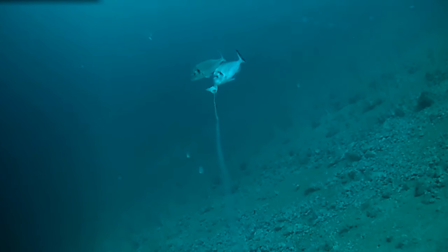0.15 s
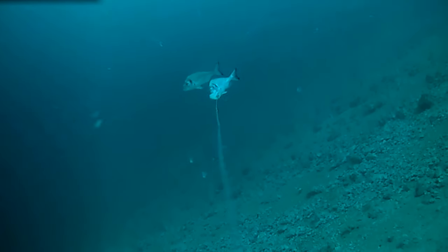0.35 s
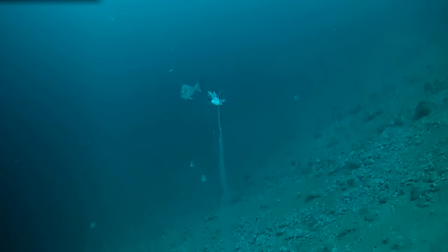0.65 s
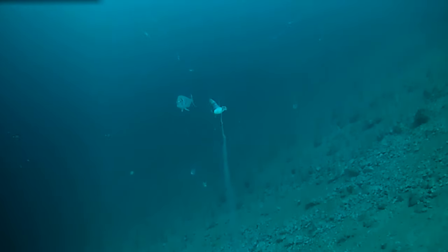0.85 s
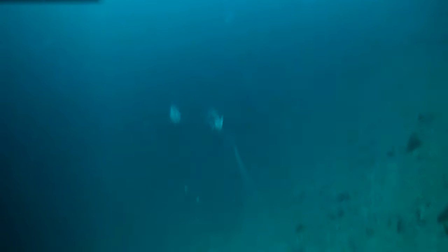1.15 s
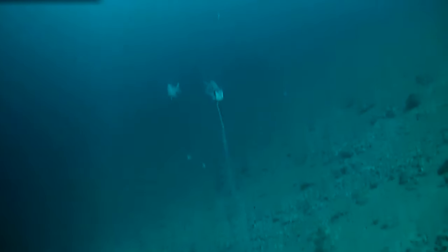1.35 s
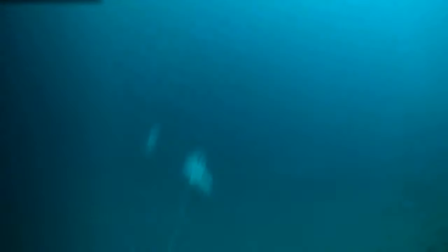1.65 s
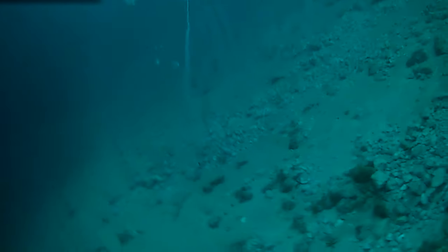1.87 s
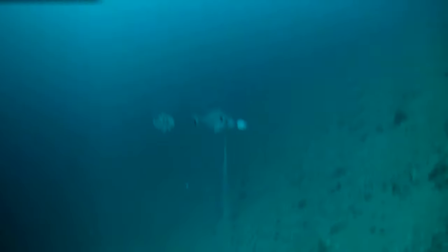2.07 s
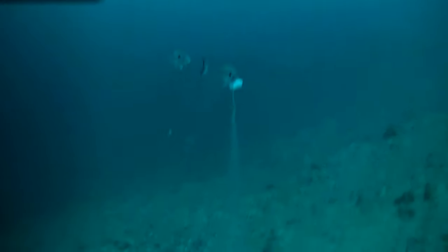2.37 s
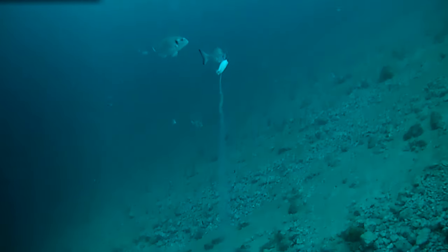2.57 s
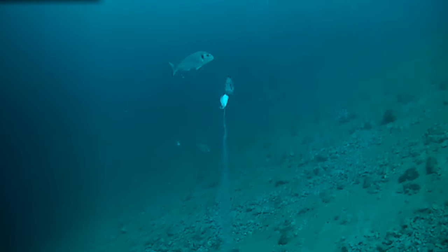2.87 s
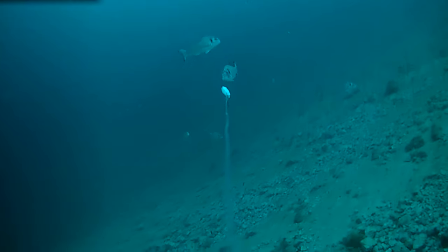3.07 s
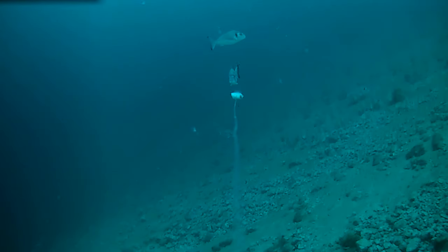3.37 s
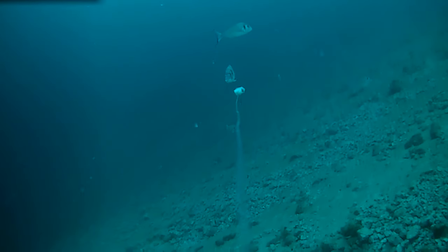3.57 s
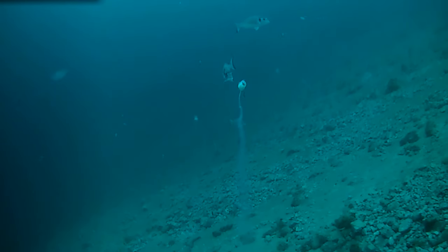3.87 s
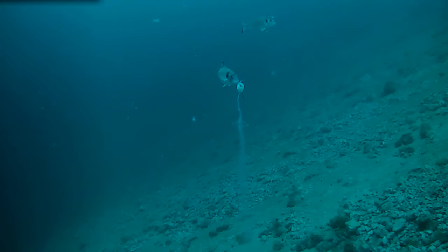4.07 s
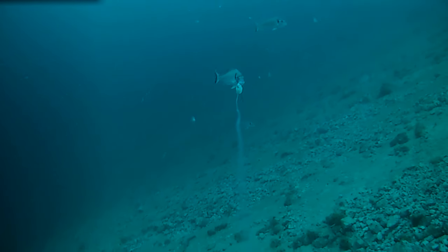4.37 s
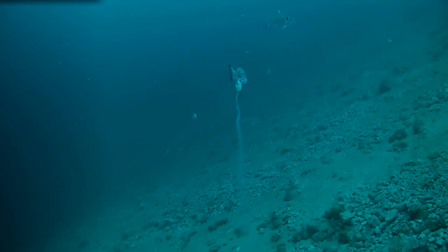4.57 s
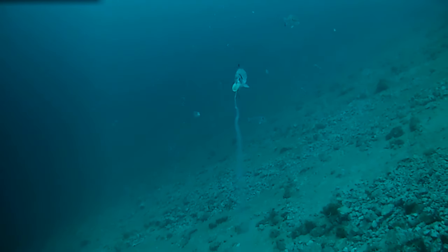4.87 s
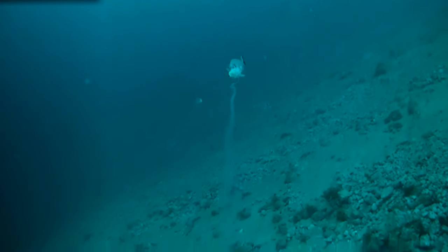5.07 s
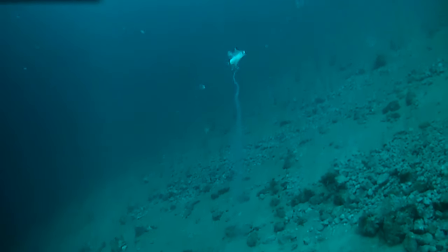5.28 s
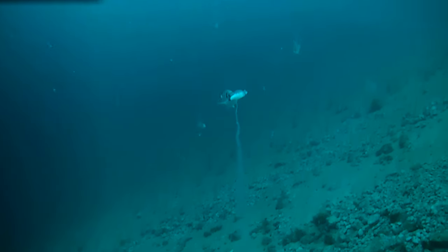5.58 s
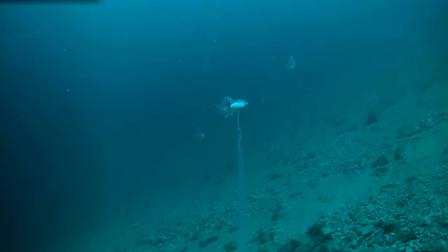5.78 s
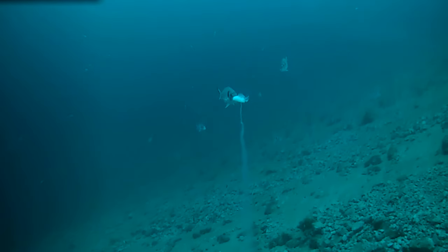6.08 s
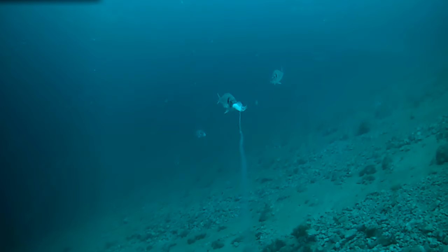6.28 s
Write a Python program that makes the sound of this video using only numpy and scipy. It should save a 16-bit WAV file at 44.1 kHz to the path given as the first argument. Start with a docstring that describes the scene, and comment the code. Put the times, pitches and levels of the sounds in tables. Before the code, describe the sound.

Under water, a camera in a plastic housing picks up a constant fine crackle of distant shrimp with sharper nearby snaps. After a second, light ticks and rubs build into a loud rattling clatter on the housing, peaking with a short thump. Then sparse snaps continue, until one hard knock just after five seconds. Sound sits left; the right side has only hiss and tiny fizz.

```python
"""Snapping shrimp crackle all round a camera in a plastic housing under water, and fingers tick and rub on it.
Claws, nails and fittings are noise bursts and stick-slip grains ringing the resonant modes of the housing; low
thumps of the overloaded or stepping input are decaying sines. Only the left input has a microphone: the right one
carries amplifier hiss, tiny blips and a short fizz about twice a second."""
import sys
import numpy as np
from scipy import signal
from scipy.io import wavfile

SR = 44100
rng = np.random.default_rng(int(sys.argv[2]) if len(sys.argv) > 2 else 0)


def digitize_waveform(pressure):
    """Quantize a signal to 16-bit integers and store it at the path in sys.argv[1].

    Rows of a 2-D input are taken as channels; values are limited to [-1, 1].
    """
    field = np.atleast_2d(pressure).T
    bounded = np.clip(field, -1, 1)
    quanta = np.round(bounded * 32767).astype(np.int16)
    wavfile.write(sys.argv[1], SR, quanta)


def volts(x):
    """Linear amplitude factor 10**(x/20) for a level x in dB, scalar or array-like."""
    e = np.asarray(x, float) / 20
    return 10 ** e


N = 283563

# Slow modes of the shell. Each row: frequency in Hz, width in Hz, relative level in dB.
SHELL_MODES = [(504, 22.5, -23), (621, 63, -14), (865, 34, -13), (1290, 56, -5.5), (1373, 170, -5),
               (1660, 76, -9.5), (1856, 86, -8), (2198, 100, 0.5), (2620, 99, 0)]
# Broad modes of the wall. Each row: frequency in Hz, width in Hz, relative level in dB.
WALL_MODES = [(3094, 500, -8.5), (3150, 310, -5.5), (3650, 550, 2.5), (3710, 610, -6), (4503, 207, -3),
              (5052, 217, -0.5), (5888, 164, -3.5), (6466, 790, 0.5), (7415, 254, -2.5)]
# Broad modes of the air pocket round the microphone. Each row: frequency in Hz, width in Hz, relative level in dB.
POCKET_MODES = [(8240, 600, -0.5), (9370, 590, -1.5), (10010, 550, -2), (10850, 790, -1.5),
                (11260, 500, -4), (12840, 400, -3), (13250, 380, 1), (15400, 650, -1)]
# Slow swell of the far shrimp bed. Each row: time in seconds, relative level in dB.
BED_LEVEL = [(0, -48.5), (1.5, -50), (1.79, -50.5), (1.97, -51.5), (2.44, -51.5), (2.69, -53.5),
             (3.04, -53.5), (3.4, -54.5), (3.62, -53), (4.44, -53), (6.43, -52.5)]


def curve(rows):
    """Level curve, straight in dB between its rows, as a gain at every sample."""
    s, db = np.transpose(rows)
    return volts(np.interp(np.arange(N) / SR, s, db))


def ring(x, hz, width):
    """One two-pole mode; noise passes at a level free of the width."""
    r = np.exp(-np.pi * width / SR)
    w = 2 * np.pi * hz / SR
    mode = signal.lfilter([np.sqrt(1 - r * r) * np.sin(w)], [1, -2 * r * np.cos(w), r * r], x)
    # band-passed once more so that the valleys between modes stay dark
    edges = [hz / 1.3, min(hz * 1.3, 0.45 * SR)]
    return signal.lfilter(*signal.butter(1, edges, "band", fs=SR), mode)


def strike(s, ms, groups, size=600, scatter_db=1.2):
    """Short decaying noise pushes; each drives every mode of every (modes, dB per push) group by its own amount."""
    crack_ms, crack_db = 0.19, 0.5
    age = np.arange(size)
    at = np.minimum((s * SR).astype(int)[:, None] + age, N - 1)
    body = np.exp(-age / (np.maximum(ms, 0.1)[:, None] * SR / 1000))
    # the first contact is the sharpest
    shape = body + volts(crack_db) * np.exp(-age / (crack_ms * SR / 1000))
    push = shape * rng.standard_normal(at.shape)
    # every push keeps the energy of its envelope, whatever its noise
    push *= np.linalg.norm(shape, axis=1, keepdims=True) / np.linalg.norm(push, axis=1, keepdims=True)
    out = 0
    for modes, db in groups:
        luck = rng.standard_normal((len(s), len(modes), 2))
        # signs differ from mode to mode, so their skirts do not add up
        gain = volts(scatter_db * luck[..., 0]) * np.sign(luck[..., 1])
        for k, (hz, width, mode_db) in enumerate(modes):
            drive = push * (volts(db + mode_db) * gain[:, k])[:, None]
            train = np.bincount(at.ravel(), drive.ravel(), N)
            out = out + ring(train, hz, width)
    return out


def bed(count=3000, spread_db=2.0, tilt_db=7.0):
    """Hundreds of distant claws a second, in small flurries and mostly faint, over their own blur of noise."""
    chance = rng.random((count, 4))
    flurries = rng.random(count // 6) * N / SR
    s = np.clip(np.repeat(flurries, 6) + 0.05 * chance[:, 0] ** 2, 0, N / SR)
    ms = 0.13 + 0.62 * chance[:, 2]
    db = -spread_db * np.log(1 - chance[:, 1] * 0.95) - 3.0
    pocket_db = db - 13.5 + tilt_db * rng.standard_normal(count)
    upper_db = db + 0.9 * (chance[:, 3] - 0.5)
    groups = [(SHELL_MODES, db - 14.0), (WALL_MODES[:5], db), (WALL_MODES[5:], upper_db),
              (POCKET_MODES, pocket_db)]
    crackle = strike(s, ms, groups, size=200)
    blur = np.zeros(N)
    for modes, share_db in ((SHELL_MODES, -22), (WALL_MODES, -11), (POCKET_MODES, -14)):
        for hz, width, mode_db in modes:
            blur += volts(mode_db + share_db) * ring(rng.standard_normal(N), hz, width)
    return curve(BED_LEVEL) * (crackle + blur)


def amplifier():
    """White hiss on both inputs; the open right one also picks up one-sided blips and bursts of fizz."""
    # Start of each fizz in seconds.
    fizz_starts = [.111, .672, 1.173, 1.793, 2.367, 2.852, 3.349, 3.889, 4.383, 4.945, 5.445, 6.060]
    fizz_s, fizz_db = 0.026, -56.5
    out = volts([[-65.5], [-66.8]]) * rng.standard_normal((2, N))
    t = np.arange(N) / SR
    fizz_gate = sum(volts(fizz_db) * ((t >= s) & (t < s + fizz_s)) for s in fizz_starts)
    fizz = fizz_gate * rng.laplace(size=N) * 0.8
    # about 300 narrow and 60 wide blips a second, 6 and 18 samples long
    narrow = (rng.random(N) < 300 / SR) * rng.random(N)
    wide = (rng.random(N) < 60 / SR) * rng.random(N)
    blips = volts(-56) * np.convolve(narrow, np.ones(6), "same")
    blips += volts(-55) * np.convolve(wide, np.ones(18), "same")
    out[1] += fizz + blips - blips.mean()
    return out


def claws(s, db, centre_hz):
    """A sharp burst through the wall, hardly moving the shell; each claw has its own colour."""
    usual_ms, spread = 1.4, 0.3
    # a claw drives a mode less the further it lies from its centre
    off_centre_db_per_octave = 10
    ms = usual_ms * np.exp(spread * rng.standard_normal(len(s)))
    groups = []
    for modes, coupling_db in ((SHELL_MODES, -15), (WALL_MODES, -6), (POCKET_MODES, -8)):
        for mode in modes:
            octaves = abs(np.log2(mode[0] / centre_hz))
            groups.append(([mode], db + coupling_db - off_centre_db_per_octave * octaves))
    return strike(s, ms, groups)


def snaps(count=150):
    """The nearest claws one by one, and a scatter of fainter ones at middle distance that follows the bed."""
    # The nearest shrimp. Each row: time in seconds, relative level in dB, centre in Hz.
    near_snaps = [(0.0463, -31.5, 3400), (0.1391, -34.5, 6200), (0.2757, -21, 5540), (0.3077, -31, 3100),
                  (0.3144, -29.5, 3630), (0.338, -28, 5000), (0.4873, -34.5, 3550), (0.5011, -24, 3400),
                  (0.5643, -27.5, 4760), (0.711, -35, 3560), (0.7687, -24, 5600), (0.7847, -30, 3900),
                  (0.7993, -28, 3470), (0.8272, -33.5, 5070), (0.8838, -35, 4890), (0.8966, -24.5, 4600),
                  (1.037, -40, 5700), (1.489, -33, 3530), (1.9714, -36.5, 3620), (2.0567, -38, 4530),
                  (2.1246, -47, 3470), (2.2584, -31.5, 3490), (2.2827, -34, 3740), (2.3401, -33, 3520),
                  (2.4514, -36, 3580), (2.5047, -29, 3370), (3.0034, -34, 5000), (3.4123, -41, 3700),
                  (3.4321, -36.5, 3560), (3.456, -34.5, 7060), (3.478, -36, 5050), (3.4864, -41, 3790),
                  (3.5503, -36, 3840), (3.5964, -37, 4400), (3.6004, -30, 5080), (3.6234, -31.5, 3600),
                  (3.6454, -35, 3770), (3.6534, -38, 3150), (3.6835, -40, 7000), (3.6935, -34.5, 6400),
                  (3.7316, -39, 3610), (3.8097, -33.5, 4840), (3.831, -37, 3720), (3.8705, -37.5, 5770),
                  (3.9893, -42, 4920), (4.1825, -37.5, 3540), (4.3088, -34, 4870), (4.4024, -37.5, 3670),
                  (4.4307, -35.5, 3500), (4.622, -31.5, 3650), (4.6547, -34, 3900), (4.668, -30, 3200),
                  (4.6987, -30.5, 3450), (4.8322, -32.5, 5150), (4.8602, -30, 3700), (5.0028, -37, 5160),
                  (5.254, -35, 3810), (5.319, -34, 3700), (5.4505, -30.5, 3870), (5.5314, -31.5, 3670),
                  (5.5428, -28.5, 3900), (5.5873, -33, 3570), (5.6684, -42, 3460), (5.7743, -37.5, 3630),
                  (5.882, -33, 7840), (5.89, -23.5, 3200), (5.8978, -35, 6520), (6.1, -31.5, 4370),
                  (6.2342, -32, 3540), (6.2427, -37, 3730), (6.4023, -34.5, 3820)]
    over_bed_db, scatter_db = 8, 0.5
    usual_hz, spread_octaves = 5200, 0.88
    chance = rng.standard_normal((count, 2))
    s = rng.random(count) * N / SR
    db = over_bed_db + scatter_db * chance[:, 0]
    centre_hz = usual_hz * 2 ** (spread_octaves * chance[:, 1])
    middle = claws(s, db, centre_hz)
    return claws(*np.transpose(near_snaps)) + curve(BED_LEVEL) * middle


def ticks():
    """Nails and fittings click on the housing and leave the shell ringing."""
    # Each row: time in seconds, relative wall level in dB, shell over wall in dB, air pocket over wall in dB,
    # contact decay in ms.
    tick_rows = [(0.5872, -27.5, -1, -5, 2.7), (.591, -29.5, 8.5, -18, 1.34), (.653, -38, 8, -3.5, 1.5),
                 (.96, -53.5, 11.5, -12, 2.3), (.991, -37.5, 5, -18, 0.86), (1.095, -47.5, 2, -16, 1.5),
                 (1.165, -37, -2, -3, 3), (1.185, -31, 3, -8, 1.2), (1.192, -32.5, -1, -5, 2.2),
                 (1.205, -50, 6.5, -1, 6.7), (1.2525, -34.5, 12.5, -10, 4.5), (1.2551, -40, 10, -8, 2.5),
                 (1.3227, -37, 7, 1, 2.2), (1.403, -25.5, 4.5, -11, 1.9), (1.423, -41, 8.5, -7, 4.5),
                 (1.433, -23.5, 2, 1.5, 1.65), (1.572, -15, -3.5, -0.5, 1.08), (1.5919, -20, -5.5, -2, 2.6),
                 (1.597, -22.5, 1.5, 2, 2.2), (1.602, -24.5, -.5, 5, 2.5), (1.608, -31.5, 4, -2, 3.7),
                 (1.6225, -21, -0.5, -1, 5.7), (1.63, -25.5, 10.5, 6, 1.7), (1.642, -21, 2, 9, 2.7),
                 (1.6423, -9, -6, -11, 3), (1.673, -14.5, 1.5, 1, 1.8), (1.6765, -20, -5, 7, 2.1),
                 (1.692, -27, -15, -3, 2.2), (1.705, -23.5, 10, -10, 2.5), (1.71, -4.5, -10, 6, 2.9),
                 (1.7121, -4, 7, 4, 1.88), (1.74, -9.5, 5, -10, 3.2), (1.7582, -16, 8, -6, 0.95),
                 (1.767, -39.5, 7, -2, 2.1), (1.941, -47.5, 4.5, -9, 4.1), (2.046, -44, 0.5, -18.5, 2.7),
                 (2.087, -21, -0.5, -5, 1.7), (2.3105, -31.5, 2, -12.5, 1.4), (4.979, -49.5, 2, -17, 5.7),
                 (5.1462, -22, 0, 2, 2.2), (5.151, -5, 1, -10, 1.52), (5.167, -34, 4.5, -30.5, 2.2),
                 (5.264, -44, 6.5, -17, 2.3), (5.386, -35, 5, -1.5, 2.8)]
    # the deep shell modes grow by less than the blow does
    deep_db, deep_db_per_db = -11.5, 0.77
    s, db, shell_db, pocket_db, ms = np.transpose(tick_rows)
    groups = [(SHELL_MODES[:3], deep_db_per_db * db + shell_db + deep_db),
              (SHELL_MODES[3:], db + shell_db - 2.0),
              (WALL_MODES, db),
              (POCKET_MODES, db + pocket_db)]
    return strike(s, ms, groups, size=900)


def held_noise(size):
    """Random values, each held for size samples."""
    return np.repeat(rng.standard_normal(N // size + 1), size)[:N]


def friction(slides, modes, gain_db, grain_db, catch_db):
    """Dense uneven stick-slip grains, catching and letting go, excite the given modes while each slide lasts."""
    rise_db_per_s, fall_db_per_s = 1500, 1201
    t = np.arange(N) / SR
    roughness_db = grain_db * held_noise(64) + catch_db * held_noise(300)
    grains = rng.standard_normal(N) * volts(roughness_db)
    press = np.zeros(N)
    for s, length, db in slides:
        before_db = rise_db_per_s * np.maximum(s - t, 0)
        after_db = fall_db_per_s * np.maximum(t - s - length, 0)
        press += volts(db - before_db - after_db)
    return sum(volts(db + gain_db) * ring(grains * press, hz, width) for hz, width, db in modes)


def rubs():
    """Sliding skin moves only a few of the shell's modes; hard fittings shake shell, wall and lower air pocket."""
    # A finger sliding on the shell. Each row: start in seconds, length in seconds, relative level in dB.
    finger_slides = [(.985, .07, -63), (1.15, .012, -60), (1.85, .048, -46), (1.99, .012, -61)]
    # Fittings grinding on the housing. Each row: start in seconds, length in seconds, relative level in dB.
    grinds = [(1.585, .06, -42.5), (1.675, 0.036, -42.5), (1.74, 0.033, -58), (5.155, 0.0034, -49)]
    skin_modes = SHELL_MODES[2:5] + SHELL_MODES[7:8]
    hard_modes = SHELL_MODES[3:] + WALL_MODES + POCKET_MODES[:2]
    skin = friction(finger_slides, skin_modes, gain_db=6.5, grain_db=4.0, catch_db=4.0)
    return skin + friction(grinds, hard_modes, gain_db=5.5, grain_db=3.5, catch_db=3.0)


def thumps():
    """Low thumps under the hardest knocks, where the input overloads or its level steps: quickly decaying sines."""
    # Each row: start in seconds, relative level in dB, frequency in Hz, decay in ms.
    thump_rows = [(1.558, -41.5, 60.4, 7.6), (1.582, -47, 45, 9.6), (1.71, -14.5, 125, 5.4),
                  (5.15, -37.5, 297, 1.7)]
    out = np.zeros(N)
    for s, db, hz, ms in thump_rows:
        age = np.maximum(np.arange(N) / SR - s, 0)
        out += volts(db) * np.sin(2 * np.pi * hz * age) * np.exp(-age * 1000 / ms)
    return out


def scene():
    """The microphone and the thumps of its input on the left, nothing on the right, amplifier noise on both."""
    microphone = bed() + snaps() + ticks() + rubs()
    left = microphone + thumps()
    return np.array([left, np.zeros(N)]) + amplifier()


def stairs(rows):
    """Gain held from each row to the next."""
    s, db = np.transpose(rows)
    return volts(db[np.searchsorted(s, np.arange(N) / SR, side="right") - 1])


def top_cut(x):
    """Nothing passes above the cut-off."""
    return signal.sosfilt(signal.butter(12, 16000, fs=SR, output="sos"), x)


def record(dry):
    """A steady offset rides on the stepped gain, so every step leaves a soft thump; overloads clip."""
    # Level steps of the left amplifier. Each row: time in seconds, gain in dB from then on.
    left_steps = [(0, 1), (1.563, 2.5), (1.583, -3), (1.597, -6.5), (1.760, -3), (1.912, 3.5), (5.152, 0.5),
                  (5.167, 2.5), (5.318, 3)]
    # Level steps of the right amplifier. Each row: time in seconds, gain in dB from then on.
    right_steps = [(0, 0), (1.726, -6), (1.817, -4), (1.997, 0), (5.244, -3.5), (5.335, 0)]
    offset = 0.008  # of full scale
    coupling_hz, top_hz = 16, 15750
    gain = np.array([stairs(left_steps), stairs(right_steps)])
    stepped = np.clip(gain * (dry + offset) - offset, -1, 1)
    coupled = signal.sosfilt(signal.butter(1, coupling_hz, "high", fs=SR, output="sos"), stepped)
    low_pass = signal.ellip(8, 0.1, 26, top_hz, fs=SR, output="sos")
    mix = np.clip(signal.sosfiltfilt(low_pass, coupled), -1, 1)
    return top_cut(mix)


dry = scene()
out = record(dry)
digitize_waveform(out)
```